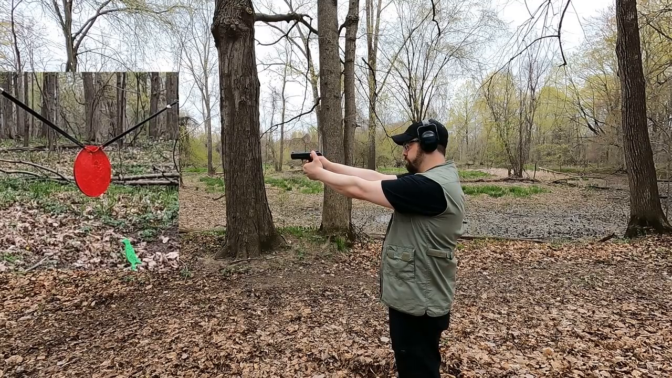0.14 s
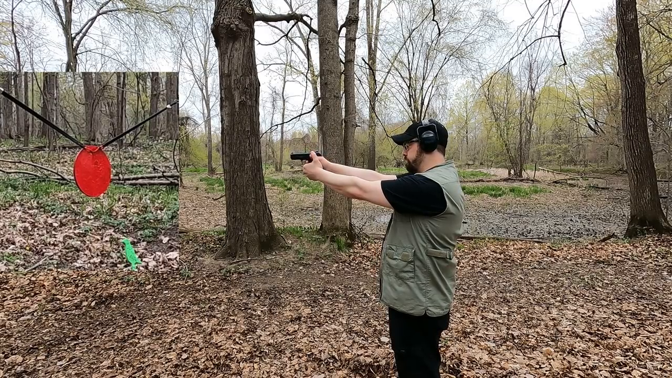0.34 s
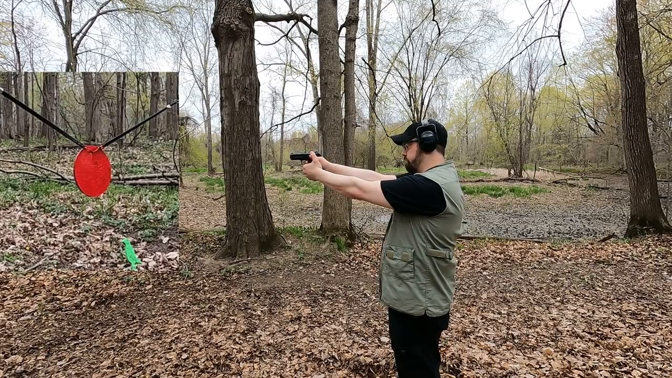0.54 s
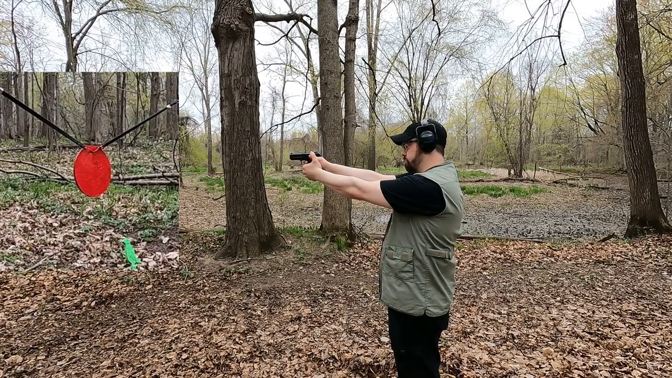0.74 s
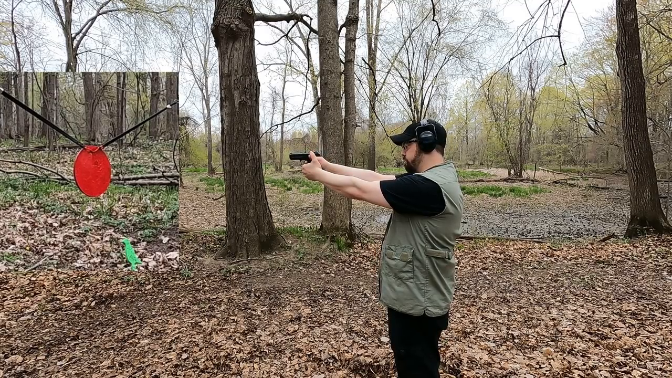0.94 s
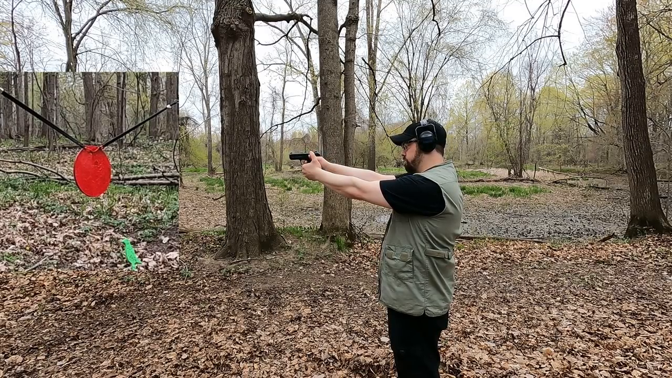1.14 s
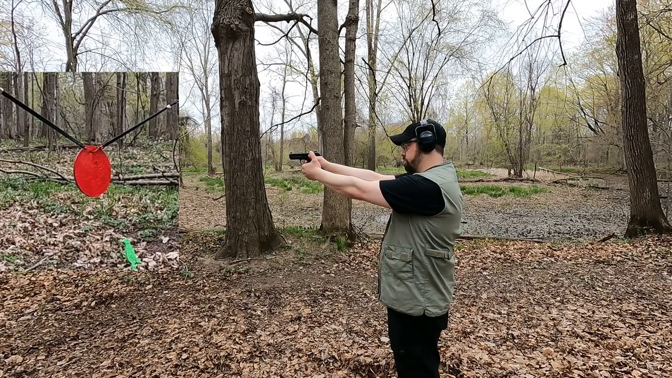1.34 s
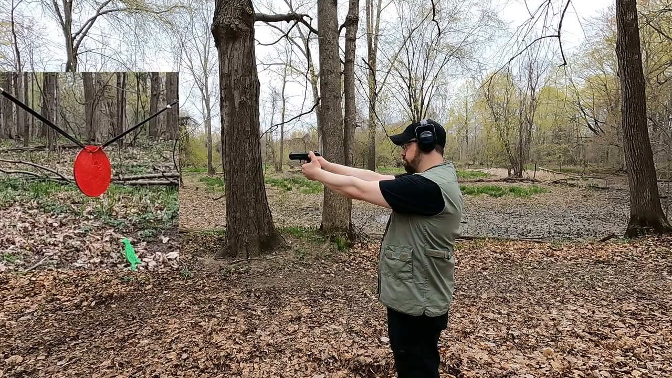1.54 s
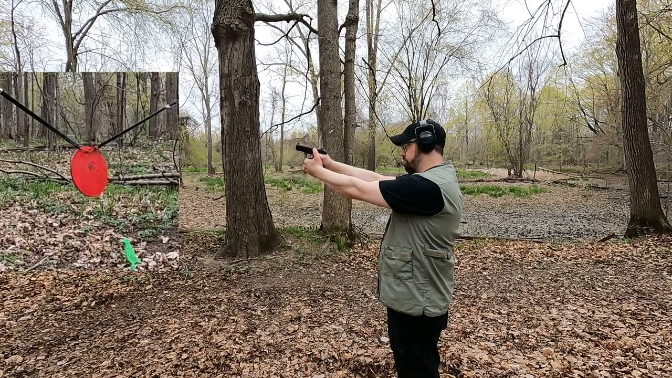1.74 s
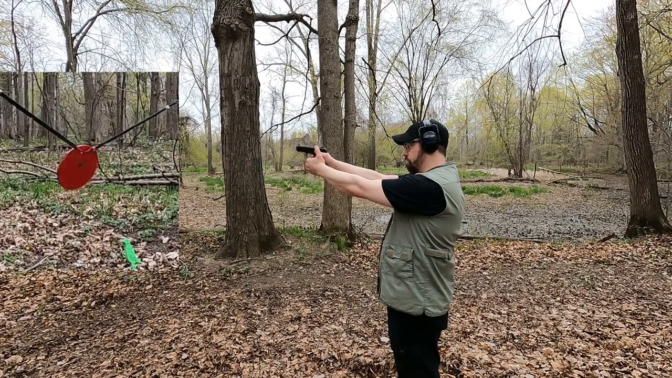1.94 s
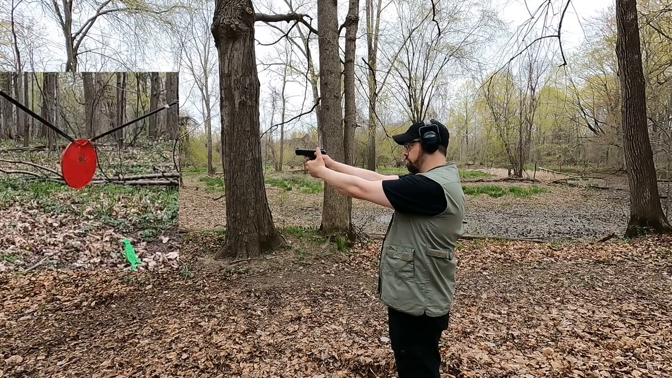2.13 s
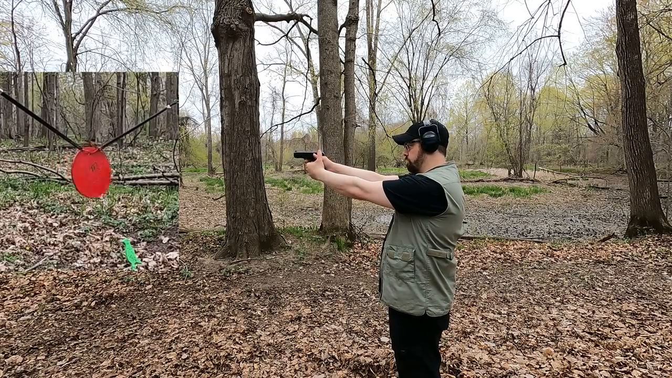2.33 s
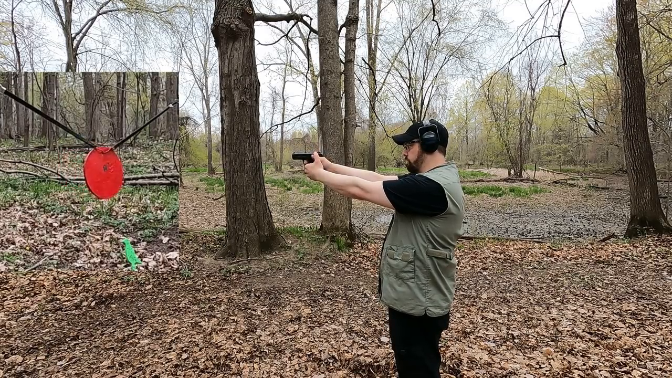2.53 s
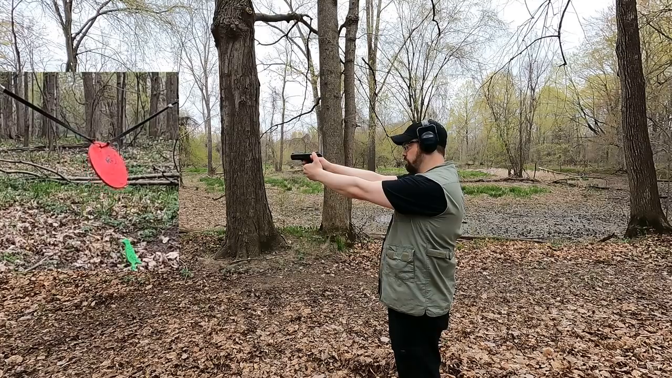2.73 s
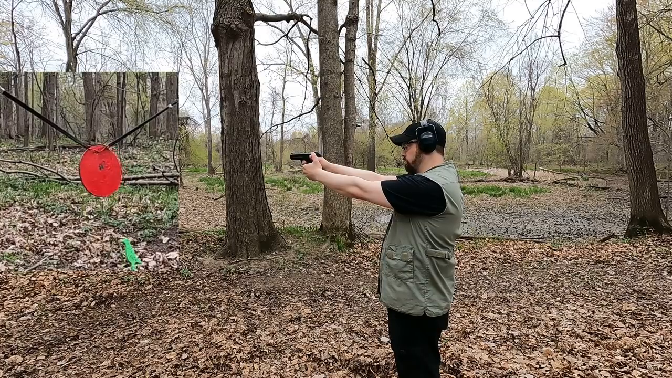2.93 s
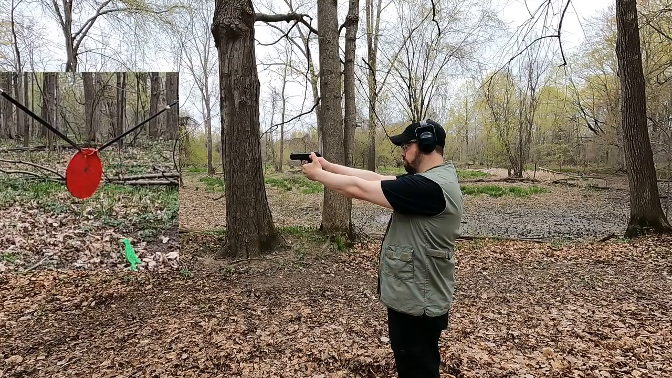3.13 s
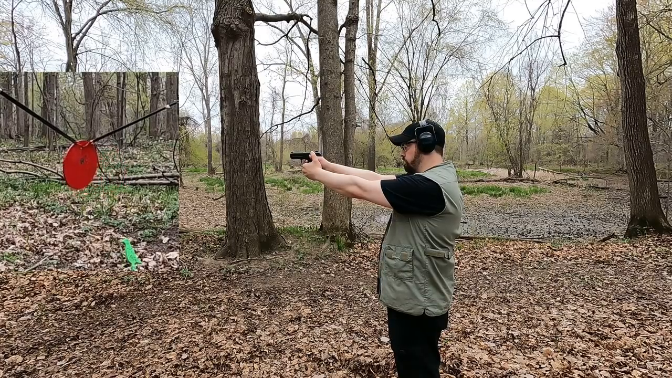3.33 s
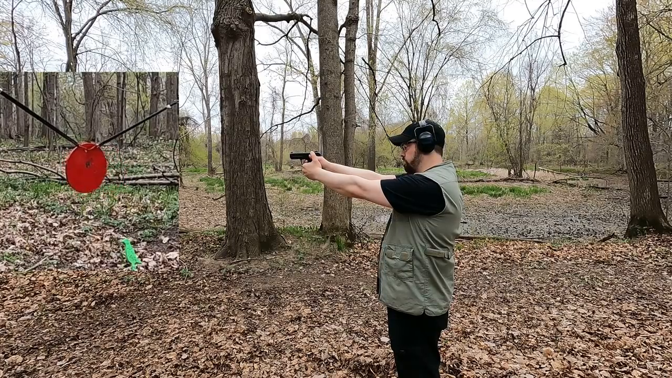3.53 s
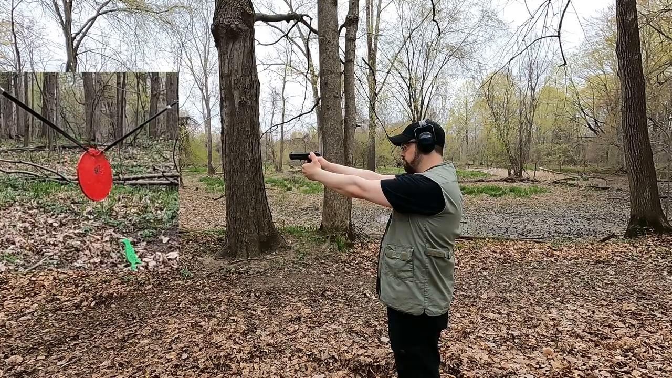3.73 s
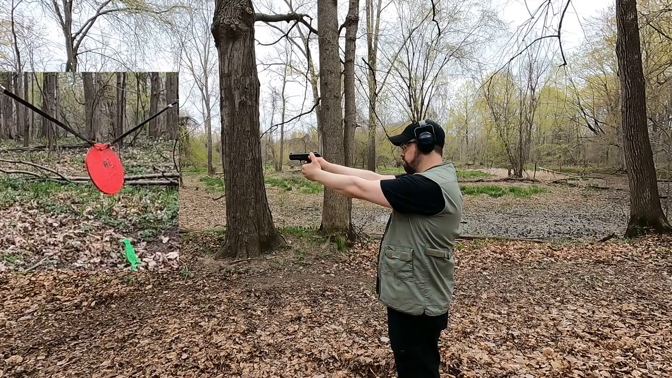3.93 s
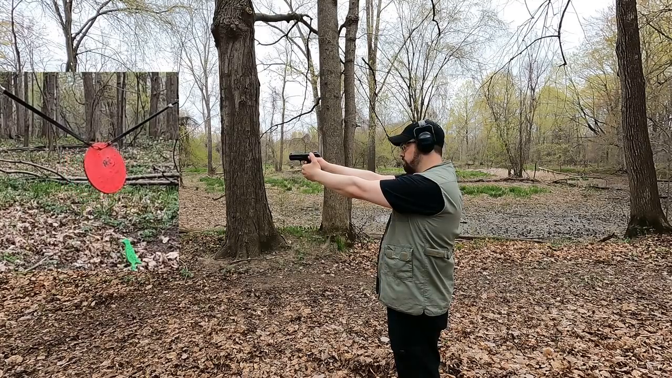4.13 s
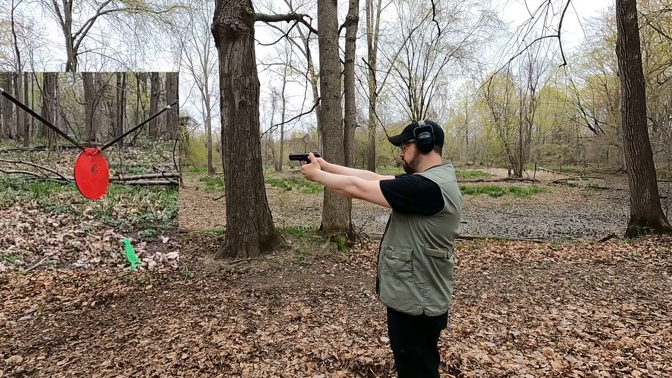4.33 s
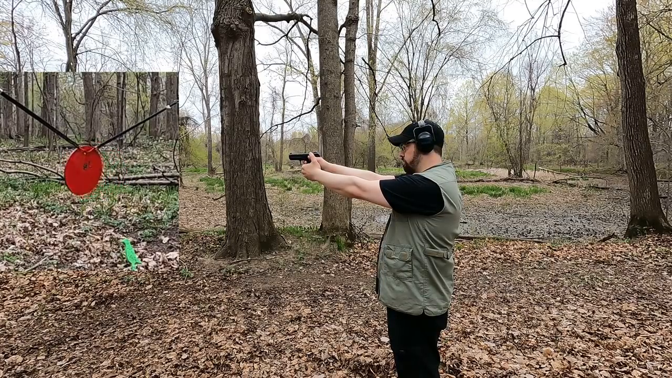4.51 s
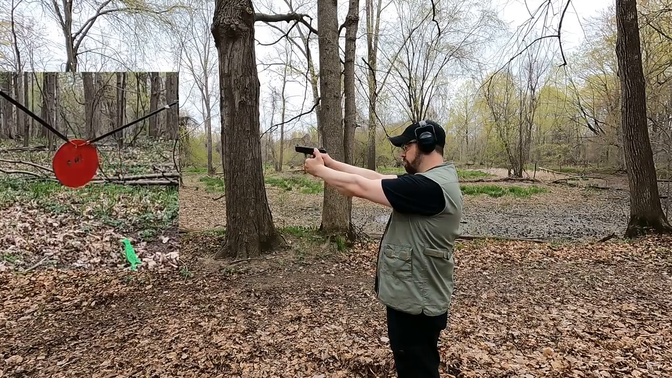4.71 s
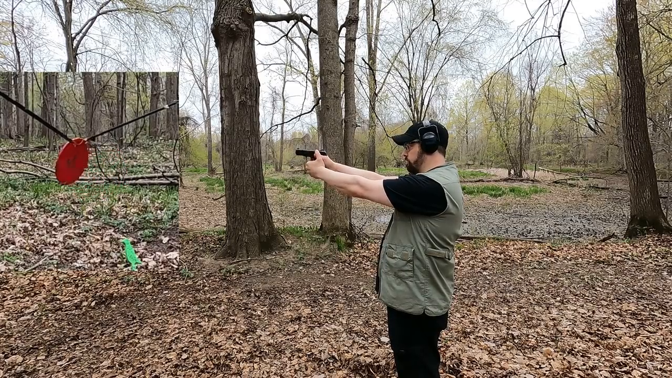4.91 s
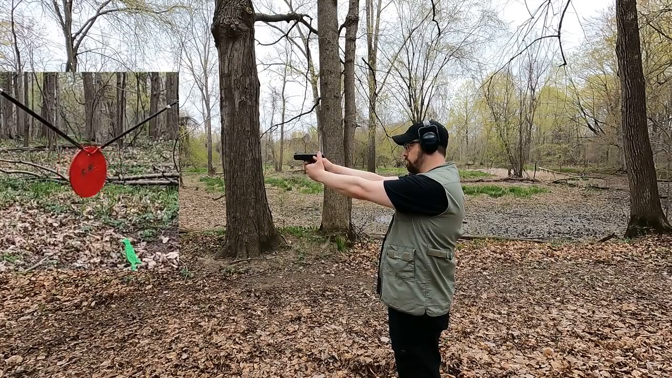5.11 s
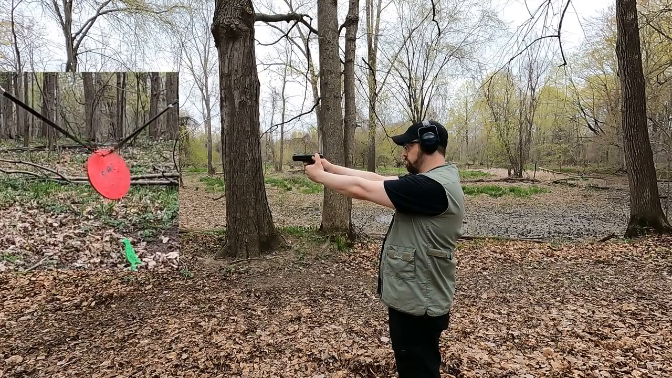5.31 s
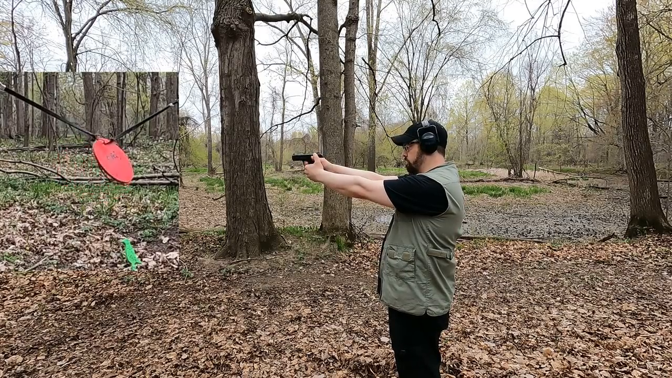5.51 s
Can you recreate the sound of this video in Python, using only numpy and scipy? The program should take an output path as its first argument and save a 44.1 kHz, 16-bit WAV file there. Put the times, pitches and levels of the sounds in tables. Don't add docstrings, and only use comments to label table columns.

```python
import sys
import numpy as np
from scipy import signal
from scipy.io import wavfile

SR = 44100
rng = np.random.default_rng(int(sys.argv[2]) if len(sys.argv) > 2 else 0)


def elevation(decibels):
    levels = np.asarray(decibels, float)
    return 10 ** (levels / 20)


def to_wav(s):
    ch = np.atleast_2d(s).T
    pcm = np.round(np.clip(ch, -1, 1) * 32767)
    wavfile.write(sys.argv[1], SR, pcm.astype(np.int16))


N = 249600
TIME = np.arange(N) / SR

# t/s, blast level/dB, trunk reflections level/dB, roar level/dB
SHOTS = [
    (1.8490, 6.06, 2.5, 0.5),
    (4.7530, 6.7, -5, -1.5),
]

# f/Hz, level/dB per Hz
AMBIENCE = [(120, -30), (200, -1), (272, -6), (530, -14), (833, -22), (1070, -14), (1330, -15),
            (1810, -23.5), (2750, -22), (3870, -34.5), (5070, -28.5), (7420, -32), (15000, -62)]
# f/Hz, left-right likeness [0-1]
AMBIENCE_LIKENESS = [(60, 0.62), (240, 0.54), (950, 0.43), (3770, 0.36), (15000, 0.12)]
# f/Hz, left-right level/dB
AMBIENCE_PAN = [(60, 5), (240, -6.5), (950, -3), (3770, 2), (15000, 2.5)]
AMBIENCE_DB, GUST_FLOOR_DB, TRAFFIC_DB = -62, -66.5, -58.5
# t/s, level/dB, half-width/s
GUSTS = [
    (.4, -60, 0.099),
    (.66, -59, 0.068),
    (1.15, -49.5, 0.022),
    (1.39, -60.5, 0.042),
    (1.75, -64, .07),
    (2.32, -68, .03),
    (3.34, -58, 0.048),
    (3.9, -66, 0.037),
    (4.15, -67, 0.039),
    (4.45, -63, 0.054),
]
THUMP_DB, THUMP_T60_S = -18.5, 0.076
DUCK_DB, DUCK_DEEPEST_S = -12.5, 0.97
HUM_DUCK_BELOW_HZ, HUM_DUCK_SHARE = 300, 0.46

# t/s, length/s, start f/Hz, end f/Hz, level/dB
NOTES = [(0.574, 0.067, 2420, 2310, -70.5), (0.632, 0.04, 2640, 2900, -69), (0.739, 0.054, 2400, 2320, -69),
         (.78, 0.029, 2950, 2770, -73), (0.923, 0.026, 2400, 2200, -69.5), (1.056, 0.057, 2730, 2930, -70),
         (1.098, 0.057, 3030, 3020, -72), (1.21, 0.033, 2300, 1920, -71), (1.32, 0.087, 2420, 2480, -69),
         (1.458, 0.031, 3006, 3006, -71), (1.478, 0.037, 2700, 2900, -68), (1.536, 0.023, 3030, 2780, -69),
         (1.594, 0.03, 2380, 2230, -68), (1.618, .04, 3040, 2950, -71)]
LOW_SAG_HZ = -57
# delay/s, level/dB
NOTE_ECHOES = [
    (.021, -4.5),
    (.047, -14.5),
    (.083, -12),
    (.13, -19),
]
# t/s, level/dB
PEEPS = [
    (3.295, -67),
    (3.468, -65),
    (3.654, -64),
    (3.859, -65),
    (4.018, -66),
    (4.179, -61.5),
]
PEEP_S, PEEP_FROM_HZ, PEEP_TO_HZ, PEEP_BEND_HZ = 0.033, 2960, 3075, 30
CHORUS_START_DB, CHORUS_SWELL_DB_PER_S = -76.5, 8.0

# t/s, peak level/dB, f/Hz, left-right level/dB
TICKS = [(0.285, -54, 6070, -0.5), (0.4794, -58, 5630, 10), (0.7524, -60, 6140, 1.5),
         (2.8545, -37.5, 5270, 1.5), (2.9512, -50, 5500, 1.0), (3.3326, -57, 6590, 7.5),
         (3.3584, -65, 4660, 1), (3.403, -55, 5200, 9), (3.566, -54, 6650, 8), (3.6136, -56, 7580, 14),
         (3.6694, -63.5, 4340, 0.5), (3.8694, -59, 6330, 9), (3.9864, -67, 4290, -4),
         (3.9994, -64, 5080, 6), (4.0503, -48.5, 7300, 8), (4.132, -43.5, 5400, -6), (4.146, -46, 7550, 9),
         (4.38, -74.5, 4890, 4), (4.485, -55, 7000, 13), (4.5657, -49.5, 5240, 10),
         (4.6294, -57, 6500, 6.5), (4.6855, -64, 4320, -2), (5.5094, -45, 5070, 8)]
# t/s, level/dB, build-up/s, t60/s
STIRS = [
    (4.07, -73.5, 0.035, 2.1),
    (4.58, -76, .02, 3.4),
]

# f/Hz, level/dB, t60/s
BLAST = [
    (143, -5, 0.007),
    (307, -6, 0.016),
    (545, -9.5, 0.022),
    (1070, -2, 0.0086),
    (2600, -16.5, 0.0046),
    (4270, -12, 0.016),
    (7400, -23, 0.011),
    (11240, -29, 0.00092),
]
BLAST_TOP_HZ = [
    15000,
    10200,
]
# delay/s, level/dB, cut f/Hz, left-right level/dB
NEAR = [
    (.0057, 2, 4370, -4.5),
    (0.0166, -10.5, 2114, 6.5),
    (0.0181, -0.5, 3000, 6),
    (0.0249, -20, 2500, -4),
    (.037, -15.5, 2500, 8.5),
    (.10, -12, 1474, 1),
    (.548, -62, 5000, 6),
    (1.673, -42.5, 1500, -6),
]
COPIES = [
    (-0.4, -6.5, -15, -27.5),
    (-4.5, -9.5, -31, -27.5),
]
COPY_SPACING_S, COPY_CUT_HZ = .01062, 5300
COPY_TREBLE_DB = -16
# push f/Hz, push level/dB, push centre t/s, push width/s, hiss level/dB
SMEAR = [
    (148.7, -8.5, -0.0055, 0.012, -14.5),
    (152, -8.5, -0.0097, 0.0073, -18.5),
]

# f/Hz, level/dB per Hz
ROAR_COLOUR = [(120, -30), (200, -22.5), (292, -7), (512, -3.5), (818, -4.5), (980, 0), (1780, -13.5),
               (4810, -15.5), (11900, -30), (15000, -44)]
# f/Hz, extra loss/dB per s
AGE_LOSS = [(250, 9.5), (500, -1), (1300, 3), (2200, 4), (3200, 14), (4500, 18), (7000, 22), (8200, 44),
            (9500, 55), (12000, 63.5)]
# f/Hz, left-right likeness [0-1]
ROAR_LIKENESS = [(60, 0.94), (180, 1), (550, 0.95), (1650, 0.66), (4970, 0.35), (15000, 0.06)]
# delay/s, level/dB at 400-1300 Hz, build-up/s, t60/s
BELTS = [
    (.03, -28, .012, 0.42),
    (.14, -26.5, 0.038, 4.26),
    (0.321, -23.5, 0.042, 1.27),
    (.55, -28.5, .015, .3),
    (1.91, -39, 0.16, 3.7),
]
# delay/s, level/dB at 60-200 Hz, build-up/s, t60/s
BOOMS = [
    (0.032, -20.5, .01, 0.082),
    (.1, -28, 0.033, 0.46),
    (.205, -26.5, .04, .3),
    (.3, -43, .05, 1.5),
]
ROAR_LEFT_DB, ROAR_SPREADS_S = 4, 0.53
SLAP_DB, NEAR_SLAP_DB, SLAPS_BLEND_S = .6, 1.0, .3

# t/s, crack level/dB, left-right level/dB
HITS = [
    (1.9806, -12.5, 9.5),
    (4.8865, -10, 10),
]
# f/Hz, level/dB against the pair
PLATE = [
    [(1344, 4), (1337, -9), (2996, 4), (3008, -14), (5569, 2), (5586, 0), (8451, 3), (8478, -4)],
    [(1341, 4), (1334, -10), (3027, 4), (3019, -10), (5105, 4), (5092, -9), (8539, 3), (8527, -7)],
]
# level/dB, t60/s, first lobe t/s, lobe spacing/s, depth/dB
SWING = [
    [(-25.5, 1.93, 0.06, .215, 5.0), (-38.5, 1.95, 0.058, 0.1595, 4.5), (-34, 1.41, 0.1, 0.12, 5.5),
     (-45, 0.69, 0.013, 0.32, 1)],
    [(-30.5, 1.83, 0.049, 0.165, 4), (-32, 1.07, 0.12, 0.198, 8.5), (-33, 1.16, 0.23, 0.31, 7.5),
     (-34, 0.75, 0.12, 0.23, 8.5)],
]
SWING_FADES_S = .4
HOLD = [
    (.1, 0.12, 0.22, 0.25),
    (.1, 0.45, 0.18, 0.078),
]
HOLD_LOSS_SHARE = 0.36
# f/Hz, level/dB against it, extra t60/s
BEAMED = [
    [(9495, -14, 2), (10248, -10, 1.5), (11140, -11, 2), (11740, -5, 3), (11820, -5, 3), (12184, -3, 3),
     (14100, -16, 4)],
    [(10260, -17, 1.5), (11340, -21, 2), (11750, -8, 3.5), (12190, -10, 2), (12250, -12, 2),
     (15460, -25, 9)],
]
# f/Hz, level/dB, t60/s
MINOR = [
    [(4226, -46, 1), (5096, -45, 1.2), (7545, -43, .8)],
    [(5570, -39, 1.6), (5580, -46, 1.6), (6056, -47, 1.2), (7528, -39, 1.1), (7558, -44, 1)],
]
SCATTER_GROWS_S = 0.12
RING_SAMPLES = 2 * SR


def rms_one(x):
    return x / np.sqrt(np.mean(x ** 2) + 1e-20)


def at_hz(points, hz):
    table = np.array(points)
    return np.interp(np.log(hz), np.log(table[:, 0]), table[:, 1])


def pan(x, db):
    return np.array([x * elevation(db / 2), x * elevation(-db / 2)])


def drift(rate, size=N):
    r = np.exp(-80 * np.pi * rate / SR)
    slow = signal.lfilter([1], [1, -2 * r, r * r], rng.standard_normal(N // 40 + 2002))[2000:]
    return np.interp(np.arange(size) / 40, np.arange(len(slow)), rms_one(slow))


def ring(clicks, hz, t60):
    r, w = elevation(-60 / (t60 * SR)), 2 * np.pi * hz / SR
    return signal.lfilter([1, -r * np.cos(w)], [1, -2 * r * np.cos(w), r * r], clicks)


def passband(x, low_hz, high_hz, order=2):
    edges = [low_hz, min(high_hz, SR / 2.2)]
    return signal.sosfilt(signal.butter(order, edges, "band", fs=SR, output="sos"), x)


def add(out, x, s):
    i = round(s * SR)
    out[:, i:i + x.shape[1]] += x[:, :out.shape[1] - i]


def stereo_noise(shared, own):
    return shared * rng.standard_normal(N) + own * rng.standard_normal((2, N))


def bands(likeness):
    edges = 200 * 2 ** np.arange(0, 6.5, 1 / 3)
    white = rng.standard_normal((2, 2, N))
    for k, (low, high) in enumerate(zip(edges, edges[1:])):
        centre = np.sqrt(low * high)
        mid, side = passband(white[k % 2], low, high, order=4)
        alike = np.clip(at_hz(likeness, centre), -1, 1)
        yield centre, np.sqrt(1 + alike) * mid + np.sqrt(1 - alike) * side * [[1], [-1]]


def swells(t, rows):
    power = 0
    for s, db, rise, t60 in rows:
        fall_db = np.where(t < s, 4 * ((s - t) / rise) ** 2, 60 * (t - s) / t60)
        power = power + elevation(db - fall_db) ** 2
    return np.sqrt(power)


def air():
    since = np.maximum(TIME - np.array(SHOTS)[:, :1], 0)
    pull = since / DUCK_DEEPEST_S * np.exp(1 - since / DUCK_DEEPEST_S)
    duck = elevation(DUCK_DB * np.sum(pull ** 2, axis=0))
    hum = np.zeros((2, N))
    for hz, noise in bands(AMBIENCE_LIKENESS):
        gain = elevation(at_hz(AMBIENCE, hz) + 1.0 * drift(0.43))
        lean = pan(1, at_hz(AMBIENCE_PAN, hz))[:, None]
        hum += noise * gain * lean * duck ** (HUM_DUCK_SHARE * (hz < HUM_DUCK_BELOW_HZ))
    traffic = passband(stereo_noise(1, 0.72), 130, 200) * elevation(1.8 * drift(6))
    gusts = passband(stereo_noise(1, .2), 36, 75, order=3) * elevation(3 * drift(7))
    puffs = elevation(GUST_FLOOR_DB)
    for s, db, width in GUSTS:
        puffs = puffs + elevation(db) * np.exp(-((TIME - s) / width) ** 2 / 2)
    thump = sum(swells(TIME, [(s, THUMP_DB, .012, THUMP_T60_S)]) for s, *_ in SHOTS)
    out = elevation(AMBIENCE_DB + 0.5) * rms_one(hum)
    out += pan(elevation(TRAFFIC_DB) * duck, -1) * rms_one(traffic)
    return out + (puffs * duck + thump) * rms_one(gusts)


def whistle(length, from_hz, to_hz, bend_hz):
    u = np.linspace(0, 1, round(length * SR))
    hz = from_hz + (to_hz - from_hz) * u + bend_hz * np.sin(np.pi * u)
    return np.sin(np.pi * u) * np.sin(2 * np.pi * np.cumsum(hz) / SR)


def birds():
    out, crowd = np.zeros((2, N)), np.zeros((2, N))
    for s, length, from_hz, to_hz, db in NOTES:
        note = whistle(length, from_hz, to_hz, LOW_SAG_HZ * (from_hz < 2500))
        add(out, pan(elevation(db + 7.5) * note, 3.5), s)
    for when, long, high, glide, loud, side in rng.random((110, 6)):
        hz = 2200 + 250 * glide if high < .4 else 2700 + 400 * glide
        note = whistle(.02 + .04 * long, hz, hz + 300 * (side - loud), -40)
        add(crowd, pan(elevation(10 * loud) * note, 8 * side - 4), 1.8 * when)
    echoes = np.zeros((2, N))
    for k, (delay, db) in enumerate(NOTE_ECHOES):
        echoes += elevation(db) * np.roll(out[::(-1) ** k], round(delay * SR), axis=1)
    out = out + echoes
    for s, db in PEEPS:
        peep = whistle(PEEP_S, PEEP_FROM_HZ, PEEP_TO_HZ, PEEP_BEND_HZ)
        add(out, pan(elevation(db + 6.5) * peep, 2.2), s)
    white = stereo_noise(1, 1)
    blur = passband(white, 2150, 2600) + passband(white, 2650, 3200)
    swell_db = CHORUS_START_DB + CHORUS_SWELL_DB_PER_S * TIME
    chorus_db = np.where(TIME < SHOTS[0][0], swell_db, -82)
    return out + elevation(chorus_db) * (0.64 * rms_one(blur) + 0.31 * rms_one(crowd))


def leaves():
    out = np.zeros((2, N))
    for (s, db, hz, side_db), noise in zip(TICKS, rng.standard_normal((len(TICKS), 400))):
        tick = passband(noise, 0.69 * hz, 1.24 * hz) + 0.052 * passband(noise, 2400, 11000, order=4)
        add(out, pan(elevation(db - 60 * TIME[:400] / 0.023) * tick, side_db), s)
    grains = rng.standard_normal((2, N)) * elevation(1.4 * drift(60))
    return out + elevation(8.0) * swells(TIME, STIRS) * rms_one(passband(grains, 4500, 7700))


def blast(near_db):
    click = np.zeros(2 * SR) + 1e-18
    click[0] = 1
    direct = sum(elevation(db) * (-1) ** k * ring(click, hz, t60) for k, (hz, db, t60) in enumerate(BLAST))
    spit = passband(rng.standard_normal((2, 2 * SR)), 2400, 5900)
    spit = elevation(0.5) * spit * elevation(-60 * TIME[:2 * SR] / 0.0064)
    direct = np.array([np.roll(direct, 4), direct]) + spit
    out = direct.copy()
    for k, (delay, db, cut_hz, side_db) in enumerate(NEAR):
        gain = pan(0.52, side_db)[:, None] * elevation(db + near_db * (k > 0))
        add(out, gain * passband(direct, 42, cut_hz), delay)
    return out


def shots():
    out = np.zeros((2, N))
    for shot, copies_db, smear, top_hz in zip(SHOTS, COPIES, SMEAR, BLAST_TOP_HZ):
        s, blast_db, near_db, _ = shot
        push_hz, push_db, centre, width, hiss_db = smear
        sound = blast(near_db)
        add(out, elevation(blast_db) * passband(sound, 45, top_hz), s)
        onset = sound[:, :900]
        early = passband(onset, 60, COPY_CUT_HZ, order=4)
        early = early + elevation(COPY_TREBLE_DB) * passband(onset, COPY_CUT_HZ, 10000)
        early = early * np.sqrt(np.hanning(1800)[900:])
        for k, db in enumerate(copies_db):
            add(out, (-1) ** (k + 1) * elevation(blast_db + db) * early, s - (k + 1) * COPY_SPACING_S)
        t = TIME - s
        push = elevation(push_db) * np.exp(-((t - centre) / width) ** 2 / 2)
        push = push * np.cos(2 * np.pi * push_hz * (t - .0052))
        started = t > -len(copies_db) * COPY_SPACING_S
        swell = started * elevation(hiss_db - np.where(t < 0, -600 * t, 700 * t))
        hiss = passband(stereo_noise(1, 0.067), 520, 3600)
        out += pan(push, -2.8) + swell * rms_one(hiss)
    return out


def roar():
    second = TIME > SHOTS[1][0]
    since = np.where(second, TIME - SHOTS[1][0], TIME - SHOTS[0][0])
    age = np.abs(since)
    strength = elevation(np.where(second, SHOTS[1][3], SHOTS[0][3]))
    on = strength * np.clip((since - .012) / 0.0051, 0, 1)
    slaps_db = (SLAP_DB + NEAR_SLAP_DB * np.exp(-age / SLAPS_BLEND_S)) * drift(76)
    wood = np.zeros((2, N))
    for hz, noise in bands(ROAR_LIKENESS):
        colour_db = at_hz(ROAR_COLOUR, hz) - at_hz(AGE_LOSS, hz) * age
        wood += noise * elevation(colour_db + slaps_db + 1.0 * drift(17))
    wood = wood / np.std(passband(wood, 400, 1500)[:, on > 0])
    boom = rms_one(passband(stereo_noise(1, 0.37), 70, 230))
    side_db = ROAR_LEFT_DB * np.exp(-age / ROAR_SPREADS_S)
    return on * (wood * pan(swells(since, BELTS), side_db) + boom * pan(swells(since, BOOMS), -2.5))


def swing_levels(swing, holds, t):
    levels = []
    for (db, t60, first, spacing, depth_db), hold in zip(swing, holds):
        decay_s = HOLD_LOSS_SHARE * np.minimum(t, hold) + np.maximum(t - hold, 0)
        lobes = np.exp(-t / SWING_FADES_S) * np.cos(2 * np.pi * (t - first) / spacing)
        levels.append(db - 60 * decay_s / t60 + depth_db * lobes)
    return levels


def plate():
    out = np.zeros((2, N))
    t = TIME[:RING_SAMPLES]
    rise = 1 - np.exp(-t / 0.0029)
    scattered = 1 - np.exp(-t / SCATTER_GROWS_S)
    for hit, pairs, swing, holds, beamed, minor in zip(HITS, PLATE, SWING, HOLD, BEAMED, MINOR):
        s, crack_db, side_db = hit
        toward = pan(0.94, side_db * np.exp(-t / 0.4))
        facing_db = swing_levels(swing, holds, t)
        levels = [(hz, db + facing_db[k // 2]) for k, (hz, db) in enumerate(pairs)]
        levels += [(hz, db + facing_db[3] - 60 * t / t60) for hz, db, t60 in beamed]
        levels += [(hz, db - 60 * t / t60) for hz, db, t60 in minor]
        for hz, level_db in levels:
            fade_db = 3.85 * scattered * np.array([drift(23, size=len(t)), drift(25, size=len(t))])
            wobble = 0.9 * scattered * np.array([drift(20, size=len(t)), drift(12, size=len(t))])
            tone = np.sin(2 * np.pi * hz * t + wobble)
            add(out, toward * rise * elevation(level_db + fade_db) * tone, s)
        crack = passband(rng.standard_normal((2, 900)), 3600, 7400) + 0.15 * rng.standard_normal((2, 900))
        crack = crack * elevation(crack_db - 60 * TIME[:900] / .014)
        add(out, crack * pan(0.58, side_db)[:, None], s)
    return out


def scene():
    return air() + birds() + leaves() + shots() + roar() + plate()


def masking(x, from_hz=8900, under_db=-44, luck_db=9):
    hz, _, spectrum = signal.stft(x, SR, nperseg=2048, noverlap=1024)
    power = np.abs(spectrum) ** 2
    loud_db = np.minimum(10 * np.log10(power.sum(axis=(0, 1)) / 2 + 1e-12), -25)
    limit_db = under_db + 2.6 * (loud_db + 25) - 25
    for low in range(np.searchsorted(hz, from_hz), len(hz), 20):
        band_db = 10 * np.log10(power[:, low:low + 20].sum(axis=(0, 1)) / 2 + 1e-20)
        spectrum[:, low:low + 20] *= band_db > limit_db + luck_db * rng.standard_normal(len(band_db))
    return signal.istft(spectrum, SR, nperseg=2048, noverlap=1024)[1][:, :N]


def band_limit(x):
    return signal.sosfilt(signal.butter(12, 15930, fs=SR, output="sos"), x)


def record(dry):
    overloaded = dry / (1 + np.abs(dry) ** 6) ** (1 / 6)
    mix = masking(overloaded)
    return band_limit(mix)


dry = scene()
out = record(dry)
to_wav(out)
```